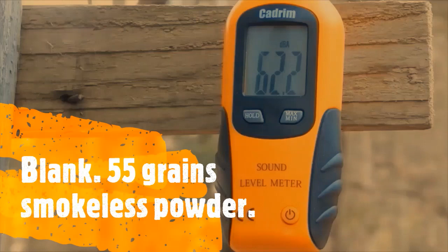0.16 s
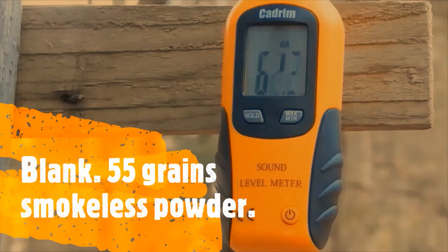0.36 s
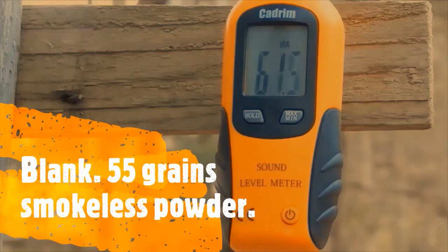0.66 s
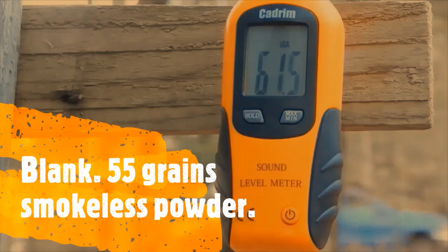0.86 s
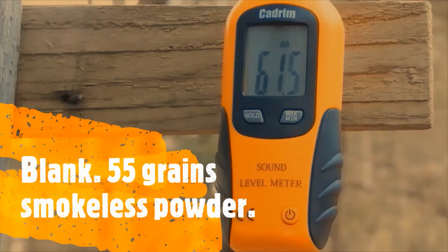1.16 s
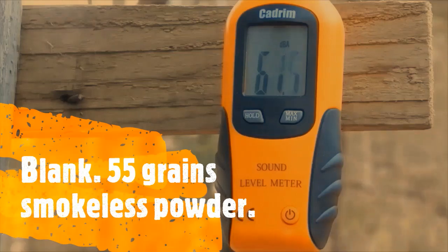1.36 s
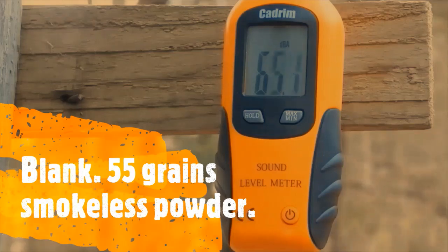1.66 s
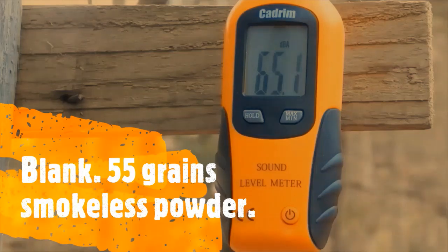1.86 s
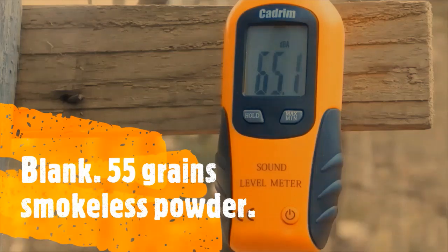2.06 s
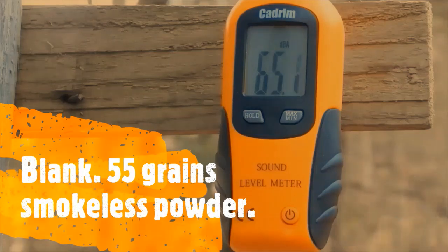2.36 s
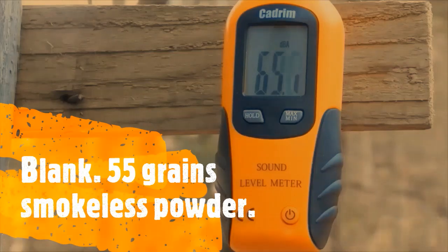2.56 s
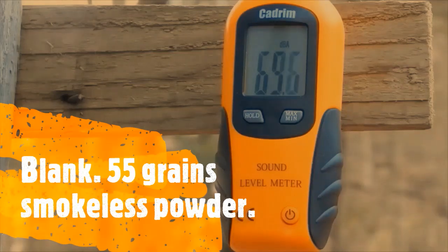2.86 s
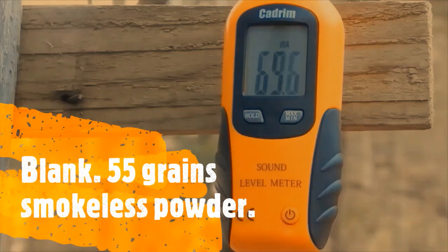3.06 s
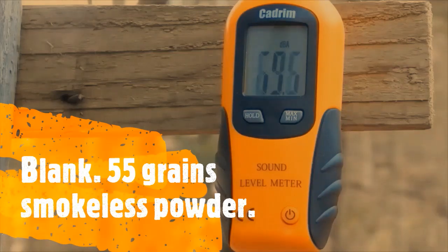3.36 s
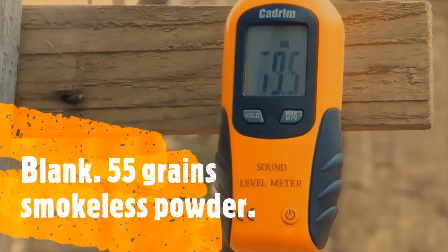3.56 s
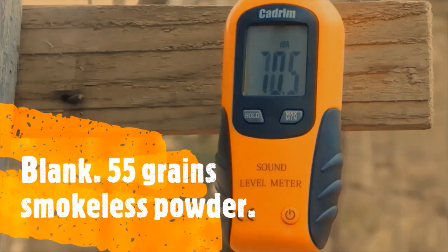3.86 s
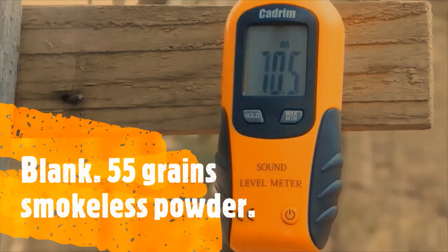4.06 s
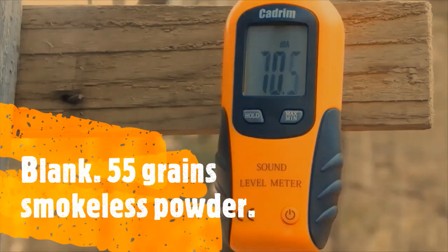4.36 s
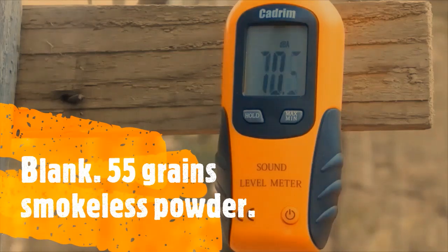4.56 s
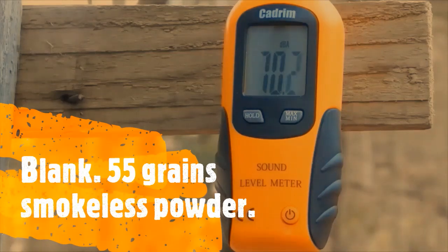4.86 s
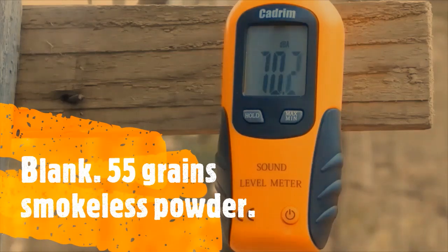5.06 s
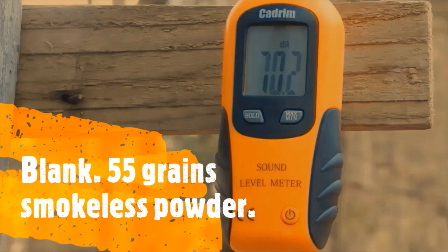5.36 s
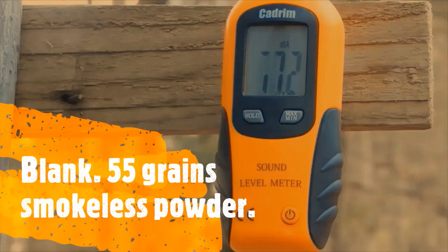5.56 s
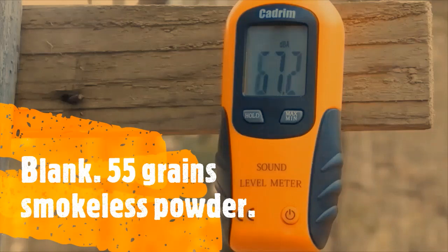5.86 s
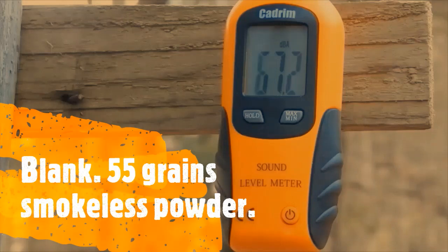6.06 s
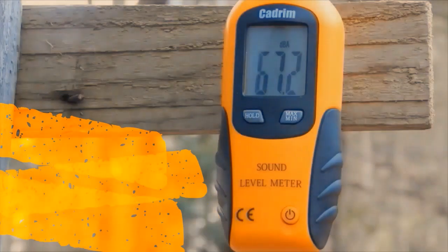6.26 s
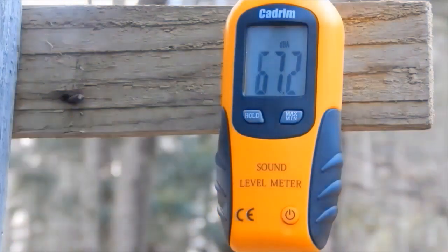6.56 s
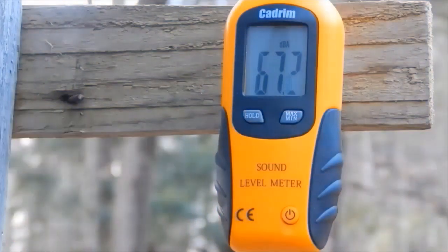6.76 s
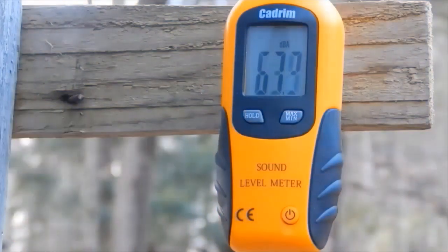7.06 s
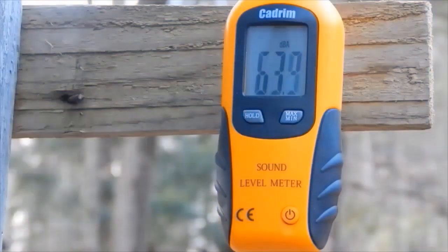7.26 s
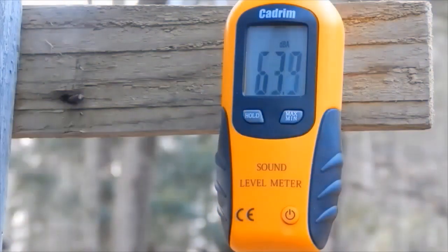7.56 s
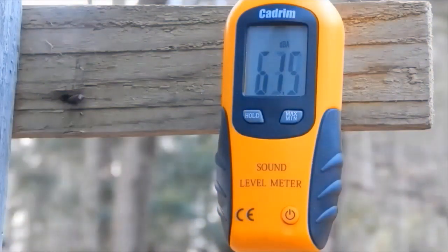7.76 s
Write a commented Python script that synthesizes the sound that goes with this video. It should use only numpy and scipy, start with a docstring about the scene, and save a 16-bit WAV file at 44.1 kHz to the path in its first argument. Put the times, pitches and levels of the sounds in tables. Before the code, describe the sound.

Outdoors among trees, a big diesel engine swells past, its deep exhaust throbbing over hissing, crunching tyres, sinking in pitch as it recedes.

```python
"""A heavy truck drives past on a dirt track among trees, about 11 m from the microphone at its nearest.
Its exhaust drones and throbs: sines on the crank orders, over noise puffs ringing in the pipe.
The engine slows a little and drops in pitch as it goes by; its bay rushes (coloured, pulsing noise) and whines.
The tyres roar and hiss over grit (noise and sparse cracks), and the truck grows duller as it draws away.
A second, slightly higher drone beats against the first; a faint outdoor rumble lies under everything."""
import sys
import numpy as np
from scipy import signal
from scipy.fft import rfft, irfft, next_fast_len
from scipy.io import wavfile

SR = 44100
rng = np.random.default_rng(int(sys.argv[2]) if len(sys.argv) > 2 else 0)


def master(y):
    """Save y as 16-bit WAV."""
    cut = np.clip(np.atleast_2d(y).T, -1, 1)
    pcm = np.round(cut * 32767)  # scale
    wavfile.write(sys.argv[1], SR, pcm.astype(np.int16))


N = 348831
TIME = np.arange(N) / SR   # s
CLOSEST_S, CLOSE_FOR_S = 3.95, 1.72   # when the engine bay sounds closest, and for how long
CRANK_START_TURNS = 0.5   # where the crank stands at 0 s
CRANK_HZ, SAG_HZ_PER_S = 19.487, 0.192   # crankshaft turns per s at the start, and how fast they sink


def from_db(db):
    """Decibels to gain."""
    return np.exp(np.asarray(db) * (np.log(10) / 20))


def rms_one(x):
    """Scale to an rms of 1."""
    return x / np.sqrt(np.mean(x ** 2) + 1e-20)


def in_time(rows):
    """Each column of a curve table, sample by sample."""
    times, *columns = np.transpose(rows)
    return [np.interp(TIME, times, column) for column in columns]


def colour(x, points):
    """Filter by a table of (f/Hz, level/dB), interpolated over log frequency."""
    size = next_fast_len(N + 4096, real=True)
    hz, db = np.transpose(points)
    bins = np.maximum(np.fft.rfftfreq(size, 1 / SR), 1)
    gain = from_db(np.interp(np.log(bins), np.log(hz), db))
    return irfft(rfft(x, size) * gain, size)[..., :N]


def drift(rate_hz):
    """Slow chance with a spread of 1: smoothed noise, drawn at every 40th sample."""
    pole = np.exp(-80 * np.pi * rate_hz / SR)
    noise = rng.standard_normal(N // 40 + 2002)
    slow = signal.lfilter([1], [1, -2 * pole, pole * pole], noise)[2000:]   # without the filter's start
    return np.interp(np.arange(N) / 40, np.arange(len(slow)), rms_one(slow))


def resonate(x, hz, width):
    """A resonance with a gain of 1 on top."""
    r = np.exp(-np.pi * width / SR)
    zeros = np.array([1, 0, -1]) * (1 - r * r) / 2
    poles = [1, -2 * r * np.cos(2 * np.pi * hz / SR), r * r]
    return signal.lfilter(zeros, poles, x)


def swell(when, lasting):
    """A bell-shaped rise and fall with a top of 1."""
    return np.exp(-0.5 * np.minimum(((TIME - when) / lasting) ** 2, 40))


def bumps(rows):
    """Brief rises and dips from rows of (t/s, lasting/s, level/dB), as one gain."""
    return from_db(sum(db * swell(when, lasting) for when, lasting, db in rows))


def passing(top_db, reached_s, until_s, rise_db_per_s, fall_db_per_s):
    """Gain that rises, holds and falls away."""
    rise = rise_db_per_s * np.maximum(reached_s - TIME, 0)
    fall = fall_db_per_s * np.maximum(TIME - until_s, 0)
    return from_db(top_db - rise - fall)


# The truck's straight path past the microphone
SPEED_M_PER_S, DISTANCE_M, ABREAST_S, SOUND_M_PER_S = 11.77, 11.38, 2.486, 343


def doppler():
    """Pitch factor of the moving truck: above 1 as it nears, below 1 as it leaves."""
    along = SPEED_M_PER_S * (TIME - ABREAST_S)
    receding = along / np.hypot(along, DISTANCE_M)   # share of the speed that points away
    return 1 / (1 + SPEED_M_PER_S / SOUND_M_PER_S * receding)


# Stereo width among the trees: (f/Hz, side minus mid level/dB)
WIDTH = [(60, -31), (110, -12), (200, -28), (370, -12), (680, -11.5), (1250, -5.5), (2310, -1), (4230, 2.5),
         (7780, 0), (14300, -0.5)]


def spread(side):
    """Side signal to left and right with opposite signs, wider in the treble than in the bass."""
    return colour(side, WIDTH) * [[1], [-1]]


def scattered(pair, spectrum):
    """Two unrelated signals become one stereo sound, spread by the trees."""
    mid, side = colour(pair, spectrum)
    return rms_one(mid) + spread(rms_one(side))


# Lines of each exhaust register: (crank order, relative level/dB)
BOOM = [(2, -17), (3, 0.5)]
FIRING = [(5, 0)]
BURBLE = [(6, -1), (6.5, -22.5), (7, -0.5)]
BARK = [(8, -2), (8.5, -22.5)]
GROWL = [(9, -1), (10, -9.5)]
OVERTONES = [(11, -3.5), (12, -12), (13, -10), (14, -17.5), (15, -13.5), (16, -17), (18, -20.5)]
# How each register goes by, low notes first and rasp last:
# (top level/dB, reached t/s, held until t/s, rise/dB per s, fall/dB per s)
BOOM_PASS = (-28, 1.5, 2.0, 3, 6)
FIRING_PASS = (-14, 2, 4.5, 5, 4.5)
BURBLE_PASS = (-17.5, 3, 5.5, 5.5, 2.5)
BARK_PASS = (-14.5, 2.0, 4.0, 12.5, 11)
GROWL_PASS = (-24, 2.0, 4.0, 7, 6)
RASP_PASS = (-25.5, 4.5, 6.0, 3, 4.5)
RUMBLE_PASS = (-21.5, 2.5, 5, 5, 3)
# The rasp flares as the truck draws level and again once the pipe points back: (t/s, lasting/s, level/dB)
RASP_FLARES = [(1.95, 0.19, 6.5), (5.25, 0.105, 5)]
# The drone rolls on approach and throbs once the pipe faces the microphone:
# (t/s, smear/radians per order squared)
THROB = [(0, 2.4), (2.7, 2.3), (3.7, 1.6), (7.91, 1.6)]
BOOM_SPILL_DB = -46.5   # the boom's steady part, which spreads in all directions
LURCH_DB = 0.85   # the beat lurches a little


def exhaust(turns):
    """The drone of the tailpipe and its rumble; a little of rasp and rumble returns from the trees."""
    boom = passing(*BOOM_PASS) + from_db(BOOM_SPILL_DB)
    rumble = passing(*RUMBLE_PASS)
    rasp = passing(*RASP_PASS) * bumps(RASP_FLARES)
    smear, = in_time(THROB)
    drone = passing(*FIRING_PASS) * register(turns, FIRING, 0.1, smear)
    drone += passing(*BURBLE_PASS) * register(turns, BURBLE, 0.12, smear)
    drone += passing(*BARK_PASS) * register(turns, BARK, 0.13, smear)
    drone += passing(*GROWL_PASS) * register(turns, GROWL, 0.2, smear)
    drone += boom * register(turns, BOOM, waver=0.29)
    drone += rasp * register(turns, OVERTONES, waver=0.2)
    drone *= from_db(LURCH_DB * drift(26))
    echo = from_db(3.5) * rumble * uneven_firing(turns)
    echo += from_db(1.5) * rasp * register(turns, OVERTONES, waver=0.93)
    return drone + rumble * uneven_firing(turns) + spread(echo)


# Single lines fade or swell briefly as their ground echo cancels or backs them:
# (crank order, t/s, lasting/s, level/dB)
ECHO_SWINGS = [(3, 0.73, 0.08, -9), (3, 3.2, 0.14, 1), (3, 3.62, 0.22, -10), (5, 0.28, 0.29, 4),
               (5, 1.275, 0.11, -13.5), (5, 1.723, 0.1, -17), (5, 2.8, 0.45, 1.5), (5, 4.97, 0.091, -6.5),
               (5, 6.3, 0.09, -6), (6, 0.3, 0.23, 6.5), (6, 1.2, 0.12, -2), (6, 1.74, 0.17, 5.5),
               (6, 2.4, 0.09, -6), (6, 3.5, 0.35, -6.5), (6, 2.8, 0.23, 0), (6, 5.36, 0.17, -3.5),
               (7, 0.41, 0.12, -6), (7, 2.09, 0.3, 7), (7, 2.68, 0.12, -5), (7, 2.9, 0.39, -5),
               (7, 3.4, 0.22, 0), (7, 5.85, 0.19, -6.5), (8, 0.12, 0.12, 9.5), (8, 1.78, 0.23, 1.5),
               (8, 0.58, 0.1, -8), (8, 2.1, 0.095, 3.5), (8, 2.397, 0.11, -8), (8, 2.89, 0.049, -7.5),
               (8, 5, 0.11, -8), (9, 1.81, 0.08, -7), (9, 3.13, 0.26, -19), (11, 2.52, 0.086, 1),
               (11, 3.15, 0.14, 4.5), (11, 3.96, 0.16, -17), (11, 3.3, 0.14, 5.5), (12, 2.25, 0.12, 1),
               (13, 1.63, 0.16, -14), (13, 2.38, 0.22, 7), (13, 3.7, 0.24, -13), (14, 4.3, 0.48, 10),
               (15, 5.1, 0.083, 10)]


def register(turns, lines, waver, smear=1.5):
    """Clean crank orders; the pipe delays them unequally, which shapes how each beat throbs."""
    out = np.zeros(N)
    for order, db in lines:
        order = np.round(2 * order) / 2   # a four-stroke repeats every two turns
        angle = 2 * np.pi * order * turns - smear * (order - 6.5) ** 2
        swings = [swing for line, *swing in ECHO_SWINGS if round(line) == order]
        level = from_db(db) * bumps(swings) * (1 + waver * drift(2.5))
        out -= level * np.cos(angle + waver * drift(2.7))
    return np.sqrt(2) * out


# Exhaust pipe resonances: (f/Hz, width/Hz, relative level/dB, extra fading/dB per s after CLOSEST_S)
PIPE = [(43, 10, -13, 3), (96.2, 10.7, 10.5, 1.5), (124.7, 9, 3, 3), (159.5, 26.4, 3.5, 1.5),
        (278.6, 25, -12.5, -0.5)]
RUMBLE_LOW_CUT_HZ = 86   # the pipe radiates little rumble below this


def uneven_firing(turns, count=5):
    """No two firings are equally strong: their scatter rumbles in the pipe."""
    fires = np.diff(np.floor(count * turns), prepend=0) > 0
    puffs = (fires + from_db(-24.5)) * rng.standard_normal(N)   # gas keeps streaming between the puffs
    low_cut = signal.butter(4, RUMBLE_LOW_CUT_HZ, "high", fs=SR, output="sos")
    puffs = signal.sosfilt(low_cut, puffs)
    past_s = np.maximum(TIME - CLOSEST_S, 0)
    rumble = np.zeros(N)
    for k, (hz, width, db, fade) in enumerate(PIPE):
        ringing = resonate(resonate(puffs, hz, 2 * width), hz, width)
        rumble += (-1) ** k * from_db(db - fade * past_s) * ringing   # neighbours in opposite phase
    return rms_one(rumble)


# Engine bay spectrum; the ground echo cancels other pitches as the truck moves:
# (f/Hz on the truck, coming level/dB per Hz, near level/dB per Hz, going level/dB per Hz), all relative
BAY = [(160, -14, -22, -24), (207, 5.5, -4.5, 1), (268, 9.5, 1, 7), (322, -1, 0.5, -5.5),
       (378, 5.5, 2.5, -3), (454, 2, 1, -0.5), (502, -2, -6.5, -0.5), (573, 0, -3, 2), (635, 5, 1, 3),
       (726, -1.5, -1, -1.5), (837, 0.5, 1.5, 0.5), (875, -6, -2, -3.5), (968, -10, -3.5, -11),
       (1280, -26, -20, -14), (2500, -60, -48, -76)]


def engine_bay(turns, beat=0.1, lope=0.067, repeat_db=-6, size=2400):
    """Fan rush and a block clatter repeating every turn, swelling once and thrice a turn, sinking in pitch."""
    clatter = np.interp(turns % 1, np.arange(size) / size, rng.standard_normal(size))
    pulsing = 1 + beat * np.cos(6 * np.pi * turns) + lope * np.cos(2 * np.pi * turns)
    fan = rng.standard_normal((2, N))
    mid, side = (fan + from_db(repeat_db) * clatter * [[1], [0]]) * pulsing   # clatter in the middle only
    source = mid + spread(side)
    coming, near, going = (rms_one(colour(source, np.array(BAY)[:, [0, column]])) for column in (1, 2, 3))
    closeness = swell(CLOSEST_S, CLOSE_FOR_S)
    rush = closeness * near + (1 - closeness) * np.where(TIME < CLOSEST_S, coming, going)
    heard = np.cumsum(doppler())   # the truck's own time, in samples
    return from_db(-4.0) * np.array([np.interp(heard, np.arange(N), ear) for ear in rush])


# Brief whines of the running gear: (f/Hz on the truck, width/Hz, loudest t/s, lasting/s, level/dB)
WHINES = [(828, 40, 1.25, 0.42, -37), (880, 26, 1.55, 0.3, -40.5), (650, 40, 2.2, 0.2, -37.5),
          (790, 50, 2.2, 0.25, -38), (848, 36, 3.0, 0.24, -33.5), (1800, 200, 3.05, 0.25, -40),
          (364, 50, 3.08, 0.06, -34), (360, 36, 3.78, 0.1, -38), (845, 34, 4.8, 0.38, -35),
          (294, 20, 6.2, 0.5, -41), (632, 49, 7.42, 0.23, -41), (1210, 70, 1.3, 0.4, -45),
          (1204, 60, 2.17, 0.18, -35.5), (1240, 50, 2.6, 0.045, -34), (1277, 77, 4.05, 0.47, -42)]
WHINE_WANDER, WHINE_WANDERS_PER_S = 0.01, 8   # share by which their pitch wavers, and how fast


def whines():
    """Rough, wavering tones that sink as the truck passes, each beaming at the microphone for a moment."""
    out = np.zeros(N)
    heard_s = np.cumsum(doppler() * (1 + WHINE_WANDER * drift(WHINE_WANDERS_PER_S))) / SR
    for hz, width, when, lasting, db in WHINES:
        angle = 2 * np.pi * hz * heard_s
        tone = drift(width / 2) * np.cos(angle) + drift(width / 2) * np.sin(angle)
        out += from_db(db) * swell(when, lasting) * tone
    return out


# Tread roar spectrum: (f/Hz, relative level/dB per Hz)
TYRES = [(600, -8), (950, 1.5), (1100, 2.5), (1260, 3.5), (1450, 1), (1800, -2), (2100, -7), (2400, -10.5),
         (2800, -13), (3600, -22.5), (5500, -35), (10000, -63)]
RATTLE_DB, RATTLES_PER_S = 1.3, 60   # fast jolts of the tread


def tyre_roar(lumps_db=1.0):
    """Tread rolling and rattling over uneven ground: noise whose level jolts slowly and fast."""
    jolts = from_db(lumps_db * drift(11.4) + RATTLE_DB * drift(RATTLES_PER_S))
    return from_db(-3.0) * scattered(rng.standard_normal((2, N)) * jolts, TYRES)


# Grit spectrum, and the crisp hiss ahead of the truck: (f/Hz, relative level/dB per Hz)
GRIT = [(1200, -3.5), (2000, 12.5), (2800, 2.5), (3800, 0.5), (5000, -2.5), (6500, -6), (9000, -7),
        (11200, -9), (12500, -15.5), (14500, -22)]
CRISP = [(1500, -17), (2800, -4), (3600, -16), (7000, -31)]
GRIT_PER_S, GRIT_SIZE_DB = 1500, 2.1   # stones cracking, spread of their sizes
SAND_DB, CLUMP_DB = 10, 1.1   # sand over stones, clumping


def grit(front_db=-3.0):
    """Countless small stones crack under the tyres over a hiss of sand; it is crisper ahead of the truck."""
    sizes = from_db(GRIT_SIZE_DB * np.minimum(rng.exponential(1, N), 5))
    stones = sizes * (rng.random(N) < GRIT_PER_S / SR)
    cracks = rms_one(stones * rng.standard_normal((2, N)))
    sand = from_db(SAND_DB) * rng.standard_normal((2, N))
    crunch = clumped(cracks + sand, CLUMP_DB)
    crisp = from_db(front_db) * swell(0.64, 1.55) * scattered(rng.standard_normal((2, N)), CRISP)
    return from_db(3.5) * scattered(crunch, GRIT) + crisp * from_db(1.2 * drift(31))


def clumped(x, clump_db, splits_hz=(3200, 6000)):
    """Coarse, medium and fine grit each come in clumps of their own."""
    out = 0
    for hz in splits_hz:
        low = colour(x, [(hz, 0), (2 * hz, -60)])
        out = out + low * from_db(clump_db * drift(13))
        x = x - low
    return out + x * from_db(clump_db * drift(13))


# A tyre throws a spray of grit: (f/Hz, width/Hz, t/s, lasting/s, level/dB)
SPRAYS = [(2980, 830, 1.02, 0.09, -47), (6800, 3300, 2.4, 0.021, -44), (2880, 700, 3.9, 0.013, -38)]


def sprays():
    """Short hisses of thrown grit: resonant noise in brief swells."""
    sand = rng.standard_normal((2, N))
    return sum(from_db(db) * swell(when, lasting) * rms_one(resonate(sand, hz, width))
               for hz, width, when, lasting, db in SPRAYS)


# The far drone: (crank order, relative level/dB, waver/0-1)
FAR_LINES = [(3, -14, .3), (5, -5.5, 0.6), (6, -1, 0.5), (8, -7.5, .4), (8.5, -3, 0.65)]
# (top level/dB, reached t/s, held until t/s, rise/dB per s, fall/dB per s)
FAR_PASS = (-23, 2.1, 1.5, 15.5, 2.5)
FAR_CRANK_HZ = 20.55   # its turns per s at the start


def far_drone():
    """A slightly higher drone, likely thrown back by the trees ahead; it beats against the direct one."""
    turns = np.cumsum(FAR_CRANK_HZ - SAG_HZ_PER_S * TIME) / SR
    drone = np.zeros(N)
    for order, db, waver in FAR_LINES:
        order = np.round(2 * order) / 2
        level = from_db(db) * (1 + waver * drift(1.1))
        drone += level * np.sin(2 * np.pi * order * turns + waver * drift(0.88))
    return -np.sqrt(2) * passing(*FAR_PASS) * drone


def low_air():
    """A faint outdoor rumble under everything: noise kept to the deep bass."""
    spectrum = [(8, -22), (28, 9), (42, 8), (80, -23), (400, -64)]
    return from_db(-45.0) * rms_one(colour(rng.standard_normal((2, N)), spectrum))


# How bay, tread and grit go by: (top level/dB, reached t/s, held until t/s, rise/dB per s, fall/dB per s)
BAY_PASS = (-24.5, 1.5, 6, 3.0, 2.5)
ROAR_PASS = (-30.5, 2.0, 5.5, 3.0, 3)
GRIT_PASS = (-41, 2.5, 2.5, 4.5, 3.5)
# The rush of the truck surges and lulls: (t/s, lasting/s, roar level/dB, grit level/dB)
SURGES = [(1.18, 0.096, 0.4, 3), (2.55, 0.12, 1.3, 0.5), (2.76, 0.12, -0.3, -3.5), (3.06, 0.048, 1, -0.5),
          (3.28, 0.012, 3, 2.5), (3.48, 0.11, -4, -6), (3.79, 0.026, 2.5, 0.5), (4.08, 0.14, -0.2, -1.5),
          (3.9, 0.026, -1, -1.5), (4.42, 0.14, 2.5, 1), (5.5, 0.032, 1, 1.5)]
BAY_SURGE = 0.96   # share of the roar's surges that the engine bay follows
# Balance at the microphone: (f/Hz, left minus right level/dB)
LEAN = [(150, -.5), (300, -.1), (600, -1.2), (2200, -2.5), (4200, -.8), (10000, -.2)]


def scene():
    """Engine and wheels together, a little stronger on the right, over the low air."""
    turns = CRANK_START_TURNS + np.cumsum((CRANK_HZ - SAG_HZ_PER_S * TIME) * doppler()) / SR
    surge, grit_surge = (bumps(np.array(SURGES)[:, [0, 1, column]]) for column in (2, 3))
    bay = passing(*BAY_PASS) * surge ** BAY_SURGE * engine_bay(turns)
    roar = passing(*ROAR_PASS) * surge * tyre_roar()
    crunch = passing(*GRIT_PASS) * grit_surge * grit() + sprays()
    left, right = exhaust(turns) + bay + whines() + roar + crunch + far_drone()
    left = colour(left, [(hz, db / 2) for hz, db in LEAN])
    right = colour(right, [(hz, -db / 2) for hz, db in LEAN])
    return np.array([left, right]) + low_air()


# Narrow dips in the microphone's response: (f/Hz, width/Hz, depth/0-1)
NOTCHES = [(2498, 73, 1), (7520, 110, 0.5)]
CUTOFF_HZ = 15400


def record(dry):
    """Two narrow dips colour the treble, the highest peaks are rounded and the top is cut."""
    for hz, width, depth in NOTCHES:
        dry = dry - depth * resonate(dry, hz, width)
    rounded = dry / (1 + dry ** 8) ** (1 / 8)
    return signal.sosfilt(signal.cheby2(12, 70, CUTOFF_HZ, fs=SR, output="sos"), rounded)


dry = scene()
out = record(dry)
master(out)
```